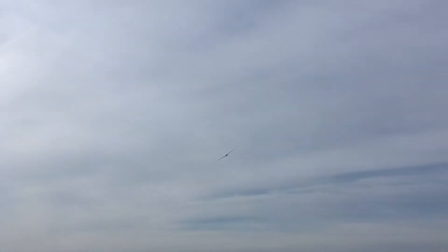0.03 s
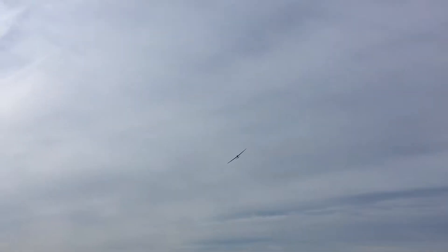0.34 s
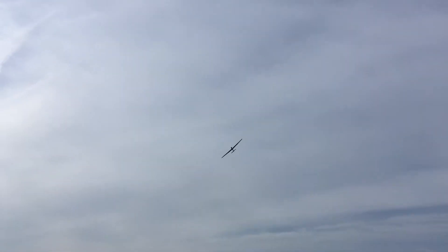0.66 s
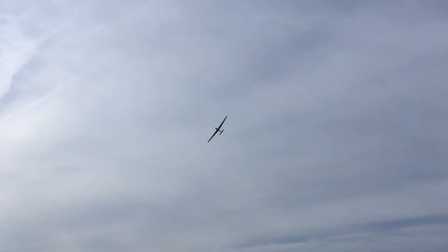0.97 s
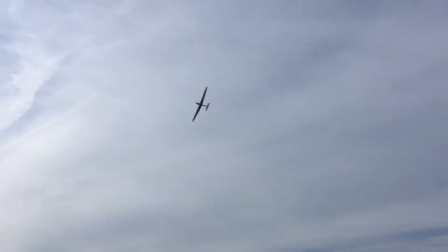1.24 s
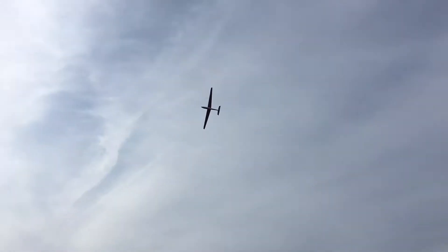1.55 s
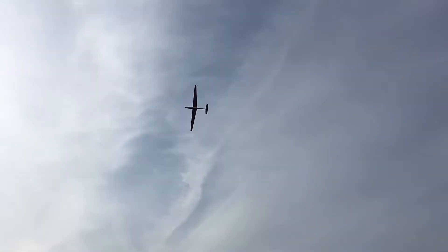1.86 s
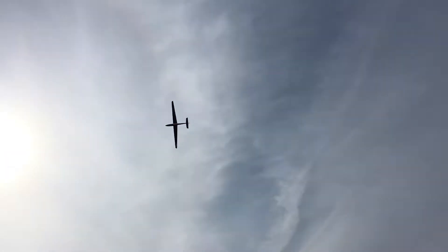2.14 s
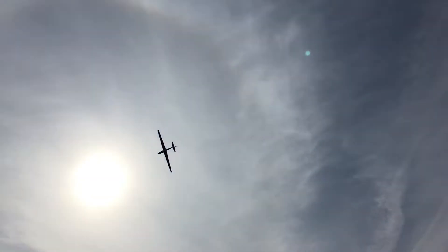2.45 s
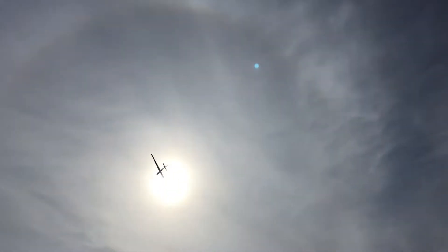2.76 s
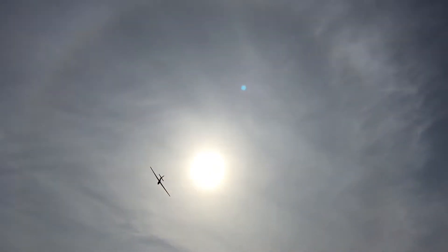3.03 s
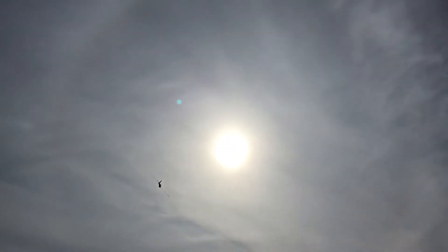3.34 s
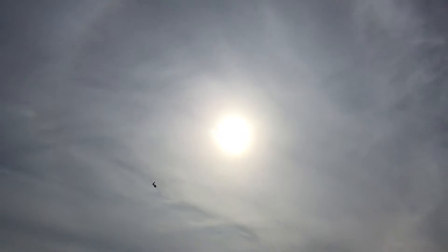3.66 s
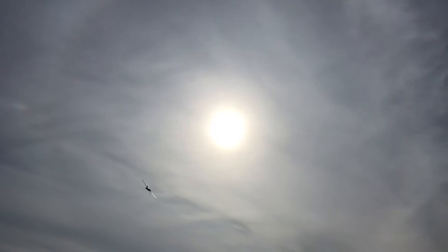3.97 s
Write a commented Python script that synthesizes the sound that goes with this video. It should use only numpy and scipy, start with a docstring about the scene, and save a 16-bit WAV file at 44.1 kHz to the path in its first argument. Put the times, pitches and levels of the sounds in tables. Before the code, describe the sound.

Gusty wind buffets an outdoor microphone with a deep rumble and irregular thumps, getting rougher as it goes. A glider's very quiet, wavering whistle slides downward and fades as it flies over, and a sharp click sounds late on.

```python
"""Wind rumbles on the microphone and rises, its eddies landing as low thumps and fluttering buffets.
Behind it a glider passes overhead: air whistles thinly at a gap in the airframe, falling in pitch
as it goes by, over a soft rush from the wings and a faint lower tone on the approach.
A few dry ticks sound, and the recorder adds a faint hiss and one sharp click."""
import sys
import numpy as np
from scipy import signal
from scipy.fft import rfft, irfft, next_fast_len
from scipy.io import wavfile
from scipy.ndimage import uniform_filter1d, minimum_filter1d, map_coordinates

SR = 44100
rng = np.random.default_rng(int(sys.argv[2]) if len(sys.argv) > 2 else 0)


def log_audio(samples):
    """Write samples as a 16-bit WAV file to the path given in sys.argv[1]."""
    # one column per channel
    frames = np.atleast_2d(samples).T
    # limit to full scale, then quantise
    limited = np.clip(frames, -1, 1)
    pcm = np.round(limited * 32767).astype(np.int16)
    wavfile.write(sys.argv[1], SR, pcm)


N = 176400

# colour of the recorder's hiss: frequency_hz, gain_db
HISS_COLOUR = [(1000, -9.5), (3500, -0.5), (5000, -3.5), (6000, 1.5), (7700, -2.5), (9000, 0), (10300, -2),
               (11500, 1), (15500, -1)]
# fader ride of the hiss, with two dips: time_s, level_db
HISS_FADER = [(0, -64), (.53, -62.5), (.56, -66), (.92, -67.5), (.95, -63), (1.3, -62.5), (2.13, -63),
              (2.17, -67.5), (2.41, -67), (2.44, -63.5), (4, -64)]
# faint dry ticks: time_s, level_db
TICKS = [(0.512, -59), (0.582, -57.5), (1.534, -56), (3.844, -53.5)]

# wind on the microphone: time_s, rumble_db, flutter_db
WIND_FADERS = [(0, -27, -36), (.3, -24, -36), (.54, -33, -54), (.9, -27, -35), (1.12, -28.5, -37),
               (1.35, -25, -36), (1.5, -30.5, -39.5), (1.9, -24, -34.5), (2.2, -27, -27),
               (2.45, -24.5, -26.5), (2.56, -33, -32.5), (2.75, -25, -27.5), (3.15, -28, -31.5),
               (3.42, -27, -27), (3.73, -26.5, -30.5), (4, -25.5, -26.5)]
# deep body of the wind: frequency_hz, gain_db
RUMBLE_COLOUR = [(15, -33.5), (28, -16.5), (45, -2), (68, 4), (100, -3.5), (150, -11), (250, -25.5),
                 (500, -60), (1500, -110)]
# low-mid flap of the wind: frequency_hz, gain_db
FLUTTER_COLOUR = [(40, -21), (100, 1.5), (160, 6.5), (260, -2), (400, -10.5), (600, -19.5), (900, -33.5),
                  (1400, -45), (2500, -81.5), (5000, -110)]
# large, slow eddies: time_s, level_db
THUMPS = [(.033, -19.5), (.15, -21), (0.336, -19.5), (.76, -17), (0.962, -15.5), (1.286, -22),
          (1.344, -14.5), (1.613, -19.5), (1.953, -23), (2.066, -21), (2.356, -20.5), (2.424, -11.5),
          (2.641, -17), (2.741, -16.5), (2.85, -14), (3.045, -16), (3.426, -21), (3.472, -20),
          (3.514, -18.5), (3.553, -18.5), (3.661, -16.5), (3.798, -21.5), (3.905, -13)]
# small, fast eddies, the faster the brighter: time_s, length_s, level_db, corner_hz
BUFFETS = [(0.011, 0.028, -26, 610), (0.225, 0.025, -31.5, 700), (.36, .015, -23, 367),
           (0.595, 0.0077, -28.5, 212), (.753, 0.021, -22.5, 217), (0.818, 0.0076, -26, 298),
           (.853, 0.0072, -26, 620), (0.873, 0.013, -20, 326), (1.049, 0.015, -39, 920),
           (1.156, 0.012, -26.5, 304), (1.253, 0.013, -18.5, 234.6), (1.325, 0.019, -24, 525),
           (1.345, 0.016, -23, 450), (1.368, .014, -23.5, 670), (1.57, 0.013, -19, 374),
           (1.639, .022, -23, 219), (1.74, .02, -21, 265), (1.832, 0.029, -32, 400),
           (2.066, 0.0071, -23.5, 506), (2.165, 0.029, -18.5, 260), (2.29, 0.0056, -27.5, 784),
           (2.4, 0.014, -16.5, 480), (2.42, 0.0061, -9.5, 513), (2.429, 0.0074, -13.5, 379),
           (2.637, 0.02, -16, 291), (2.722, 0.057, -22, 331), (2.771, 0.03, -20.5, 322),
           (2.85, .011, -14.5, 375), (2.864, 0.014, -24.5, 807), (2.921, 0.0059, -19, 370),
           (2.972, 0.012, -27, 375), (3.035, 0.015, -24.5, 278), (3.086, 0.019, -23.5, 242),
           (3.217, 0.0086, -20.5, 510), (3.238, 0.023, -20.5, 260), (3.284, 0.006, -10, 450),
           (3.329, 0.036, -22, 463), (3.356, 0.013, -19.5, 560), (3.372, 0.0069, -15.5, 620),
           (3.41, 0.015, -15.5, 520), (3.422, 0.0084, -18, 464), (3.469, 0.018, -16.5, 360),
           (3.49, 0.0069, -7.5, 620), (3.502, 0.0084, -14, 870), (3.518, 0.019, -16, 374),
           (3.53, .012, -17, 365), (3.549, 0.018, -16.5, 560), (3.59, .008, -23.5, 450),
           (3.658, 0.01, -12, 450), (3.667, .011, -14.5, 525), (3.683, .012, -19, 260),
           (3.778, 0.011, -23, 630), (3.793, 0.0071, -18.5, 454), (3.835, .016, -27, 520),
           (3.856, 0.027, -16, 500), (3.876, 0.018, -14.5, 750), (3.889, 0.012, -16, 1000),
           (3.899, 0.011, -17.5, 900), (3.909, 0.015, -13.5, 360), (3.954, 0.023, -21, 490),
           (3.974, 0.033, -23, 490)]
# dark tone of the microphone port: frequency_hz, gain_db
PORT_COLOUR = [(20, -35), (60, -12.5), (110, 1), (170, 1), (300, 0.5), (450, -2.5), (620, -1), (760, -6),
               (980, -3.5), (1350, -9), (1900, -19), (2600, -31), (4000, -48.5), (9000, -66.5)]

# air over the wings: time_s, level_db
WING_FADER = [(0, -57), (.5, -56), (.98, -55.5), (1.35, -51.5), (1.7, -54), (2.2, -55), (2.7, -54),
              (4, -55.5)]
# soft colour of that air: frequency_hz, gain_db
WING_COLOUR = [(200, -5), (600, -1.5), (950, -1.5), (1280, -4), (1550, -8), (2200, -14), (2800, -18),
               (3800, -22), (5000, -30.5), (9000, -53.5)]
# lower tone of the airframe, in two swells: time_s, level_db
LOW_TONE_FADER = [(.55, -92), (.73, -62), (.9, -77), (1.1, -62.5), (1.3, -90)]
# falling glide of the whistle: time_s, pitch_hz
WHISTLE_GLIDE = [(0, 4000), (.52, 4020), (.64, 3850), (.71, 3890), (.755, 3600), (.79, 3880), (1.15, 3630),
                 (1.33, 3500), (1.48, 3700), (1.6, 3500), (1.87, 3490), (1.98, 3200), (2.15, 3250),
                 (2.36, 3030), (2.45, 3125), (2.55, 3000), (2.66, 3140), (2.78, 3145), (2.99, 3030),
                 (3.12, 3070), (3.7, 2834)]
# swells of the whistle: time_s, level_db
WHISTLE_FADER = [(0, -89), (.21, -73.5), (.3, -86), (.55, -71.5), (.8, -72), (.86, -88), (1.1, -85),
                 (1.17, -65.5), (1.32, -64.5), (1.55, -72), (1.85, -66), (2.17, -67.5), (2.22, -79),
                 (2.36, -68.5), (2.45, -68), (2.51, -77), (2.65, -67.5), (3, -69), (3.3, -70), (3.5, -79),
                 (4, -95)]
# second strand of the whistle, overhead: time_s, pitch_hz, level_db
SECOND_STRAND = [(1.08, 3470, -100), (1.17, 3430, -68), (1.33, 3450, -73), (1.5, 3345, -75),
                 (1.63, 3414, -72), (1.85, 3413, -77), (2.12, 3120, -76), (2.3, 3050, -105)]
# loose strands that fray the whistle overhead: time_s, level_db
FRAY_FADER = [(0, -100), (1.05, -78), (1.3, -69), (1.55, -68), (2.0, -78), (2.4, -100)]


def amp(db):
    """Decibels to gain."""
    return 10 ** (np.asarray(db) / 20)


def unit(x):
    """Scale to rms 1."""
    return x / np.sqrt(np.mean(x ** 2) + 1e-20)


def curves(rows):
    """One value per sample for each column after the time."""
    times, *columns = np.transpose(rows)
    return [np.interp(np.arange(N) / SR, times, column) for column in columns]


def wobble(rate, size=N):
    """A smooth random curve, rate knots a second."""
    return map_coordinates(rng.standard_normal(4096), [np.arange(size) * rate / SR], mode="wrap")


def eq_gain(colour, hz):
    """Gain of an EQ curve, its points joined on a log frequency axis."""
    points_hz, db = np.transpose(colour)
    return amp(np.interp(np.log(hz + 1), np.log(points_hz), db))


def rolloff(ratio, order):
    """Gain of a smooth filter that closes as ratio passes 1."""
    return 1 / np.sqrt(1 + ratio ** (2 * order))


def bandpass(low_hz, high_hz, order):
    """A response that rolls off on both sides of a band."""
    return lambda hz: rolloff(low_hz / hz, order) * rolloff(hz / high_hz, order)


def filtered(x, response):
    """Pass x through a frequency response."""
    size = next_fast_len(N + SR // 2)
    return irfft(rfft(x, size) * response(np.fft.rfftfreq(size, 1 / SR)), size)[:N]


def noise(colour):
    """Coloured noise of rms 1."""
    return unit(filtered(rng.standard_normal(N), lambda hz: eq_gain(colour, hz)))


def tone(hz, flicker_db=2.6):
    """A quickly flickering sine of rms 1 on a pitch curve."""
    return unit(amp(flicker_db * wobble(85)) * np.sin(2 * np.pi * np.cumsum(hz) / SR))


def add_puff(out, time_s, length_s, db, response, size=16384):
    """Mix in a spiky puff of filtered noise: quick attack, slower release, level db over its length."""
    t = (np.arange(size) - size // 2) / SR
    attack_s, release_s = 0.15 * length_s, 0.47 * length_s
    swell = np.exp(-np.logaddexp(-t / attack_s, t / release_s))
    turbulence_db = 4 * wobble(380, size)
    spectrum = rfft(swell * amp(turbulence_db) * rng.standard_normal(size))
    # partly level out the spectrum so that the puff stays broad
    band_hz, evenness = 434, 0.69
    band_power = signal.fftconvolve(np.abs(spectrum) ** 2, np.hanning(int(band_hz * size / SR)), "same")
    spectrum /= np.abs(band_power) ** (evenness / 2)
    puff = irfft(spectrum * response(np.fft.rfftfreq(size, 1 / SR) + 1))
    puff *= amp(db) * np.sqrt(length_s * SR / np.sum(puff ** 2))
    at = round(time_s * SR) + np.arange(size) - size // 2
    inside = (at >= 0) & (at < N)
    out[at[inside]] += puff[inside]


def limited(x, ceiling=0.9, size=441):
    """Smoothly duck any peak that would pass the ceiling."""
    needed = np.minimum(1, ceiling / (np.abs(x) + 1e-9))
    held = minimum_filter1d(needed, 2 * size)
    return x * uniform_filter1d(uniform_filter1d(held, size), size)


def recorder_hiss():
    """A faint, bright noise floor that dips twice."""
    db, = curves(HISS_FADER)
    return amp(db) * noise(HISS_COLOUR)


def recorder_click(start_s=3.609, level_db=-12.5, decay_s=0.0011):
    """One sharp click: the signal jumps and sinks back."""
    t = np.arange(N) / SR - start_s
    return amp(level_db) * (t >= 0) * np.exp(-np.abs(t) / decay_s)


def ticks(length_s=0.004):
    """A few faint, dry ticks, each a tiny burst of bright noise."""
    out = np.zeros(N)
    for time_s, db in TICKS:
        add_puff(out, time_s, length_s, db, bandpass(low_hz=1210, high_hz=4500, order=2))
    return out


def wind_bed(rumble_swing_db=2, flutter_swing_db=4.5):
    """Continuous turbulence on the microphone: a deep rumble and a quicker flutter."""
    rumble_db, flutter_db = curves(WIND_FADERS)
    rumble = amp(rumble_db + rumble_swing_db * wobble(16)) * noise(RUMBLE_COLOUR)
    flutter = amp(flutter_db + flutter_swing_db * wobble(35)) * noise(FLUTTER_COLOUR)
    return rumble + flutter


def wind_eddies(thump_s=0.021, lead_s=0.002003):
    """Single eddies thump and buffet the microphone port, which passes little of their treble."""
    out = np.zeros(N)
    for time_s, db in THUMPS:
        add_puff(out, time_s - lead_s, thump_s, db, bandpass(low_hz=52.4, high_hz=114, order=4))
    for time_s, length_s, db, corner_hz in BUFFETS:
        add_puff(out, time_s - lead_s, length_s, db,
                 lambda hz: eq_gain(PORT_COLOUR, hz) * rolloff(hz / corner_hz, order=3))
    return out


def wing_rush():
    """Air over the wings makes a broad, soft rush that swells as the glider passes."""
    db, = curves(WING_FADER)
    return amp(db + wobble(12)) * noise(WING_COLOUR)


def low_airframe_tone(pitch_hz=1327, waver_hz=16):
    """A faint lower tone of the airframe, heard on the approach."""
    db, = curves(LOW_TONE_FADER)
    return amp(db) * tone(pitch_hz + waver_hz * wobble(80))


def gap_whistle(waver_hz=25, strand_waver_hz=38, fray_spacing_hz=128, wander_hz=60.3, jitter_hz=45):
    """Air at a gap sings a wavering edge tone; overhead it frays and a second strand beats against it."""
    pitch_hz, = curves(WHISTLE_GLIDE)
    edge_db, = curves(WHISTLE_FADER)
    strand_hz, strand_db = curves(SECOND_STRAND)
    fray_db, = curves(FRAY_FADER)
    edge = amp(edge_db) * tone(pitch_hz + waver_hz * wobble(130))
    strand = amp(strand_db) * tone(strand_hz + strand_waver_hz * wobble(90))
    fray = sum(tone(pitch_hz + offset_hz + wander_hz * wobble(13) + jitter_hz * wobble(170))
               for offset_hz in (-fray_spacing_hz, 0, fray_spacing_hz))
    return edge + strand + amp(fray_db) * unit(fray)


def scene():
    """Glider, wind and ticks in a mono mix."""
    glider = gap_whistle() + low_airframe_tone() + wing_rush()
    return (glider + wind_bed() + wind_eddies() + ticks())[None]


def record(dry):
    """Peaks are smoothly held below a ceiling; the recorder adds its hiss and a click, and cuts the very top."""
    top_hz = 16000
    mix = limited(dry[0]) + recorder_hiss() + recorder_click()
    return filtered(mix, lambda hz: hz < top_hz)[None]


dry = scene()
out = record(dry)
log_audio(out)
```